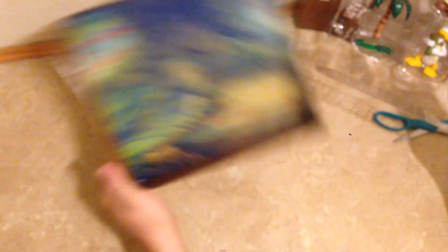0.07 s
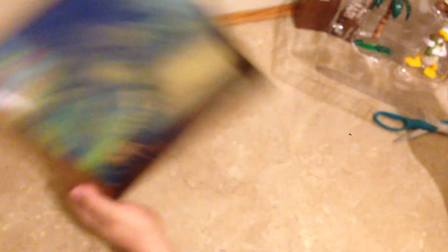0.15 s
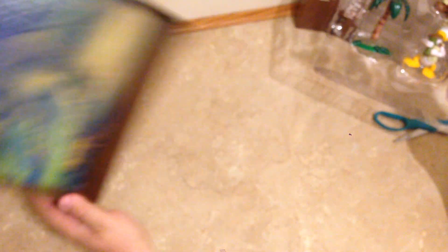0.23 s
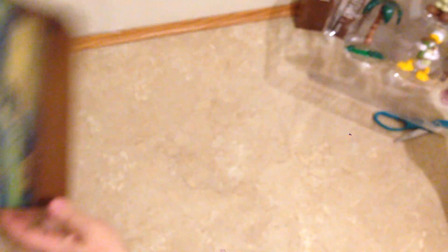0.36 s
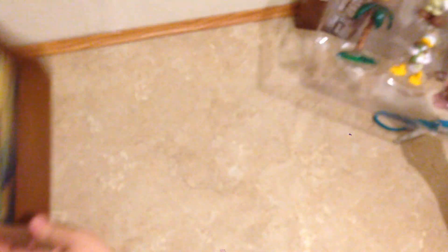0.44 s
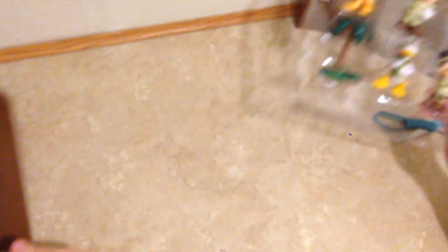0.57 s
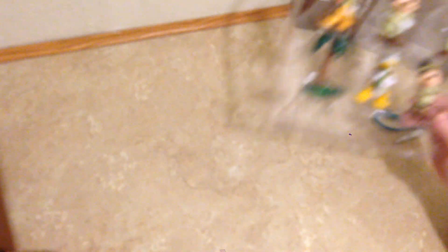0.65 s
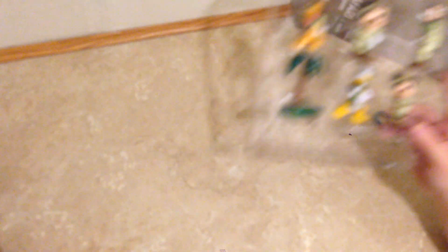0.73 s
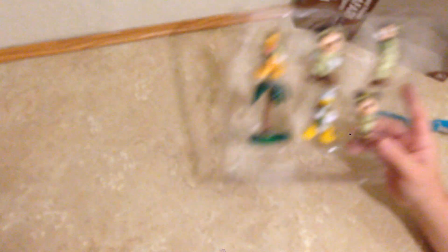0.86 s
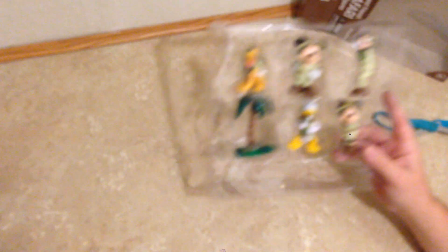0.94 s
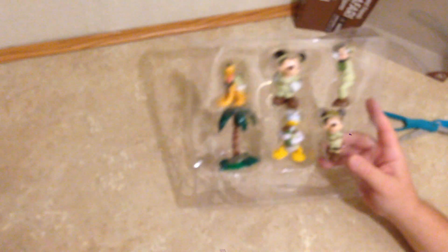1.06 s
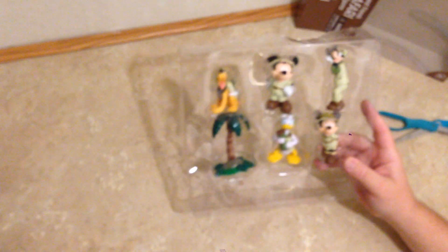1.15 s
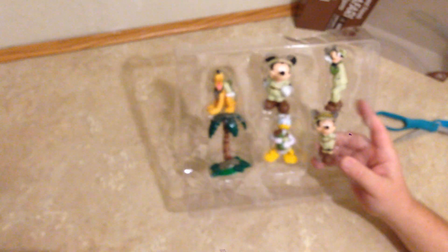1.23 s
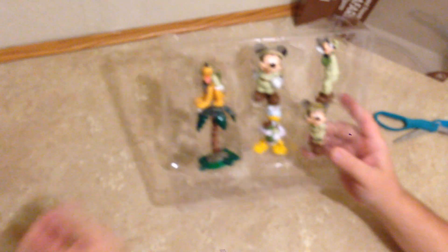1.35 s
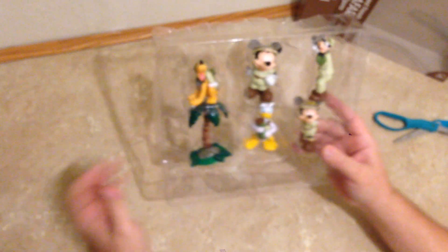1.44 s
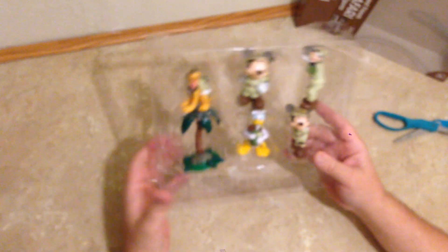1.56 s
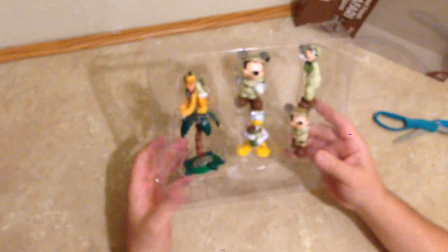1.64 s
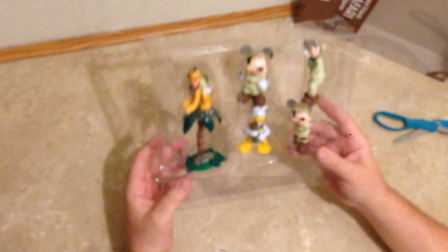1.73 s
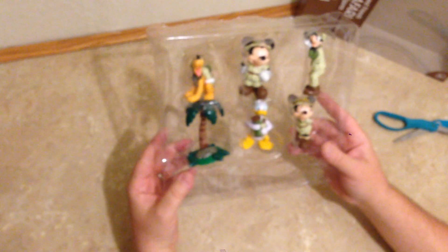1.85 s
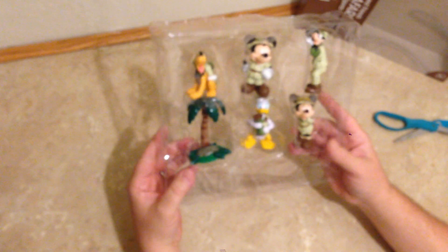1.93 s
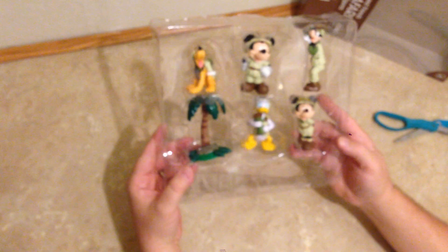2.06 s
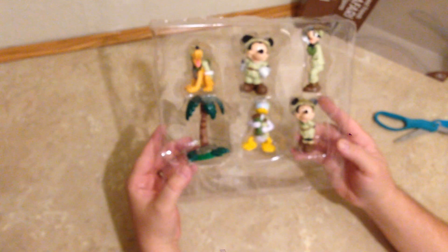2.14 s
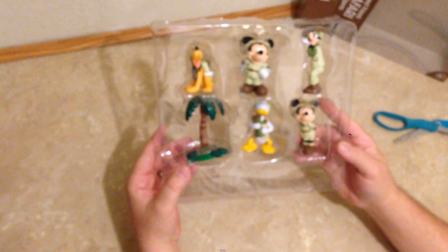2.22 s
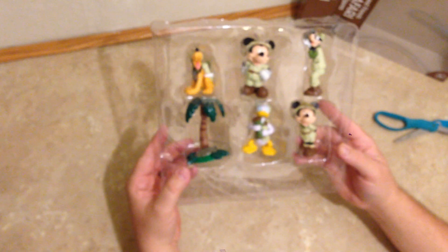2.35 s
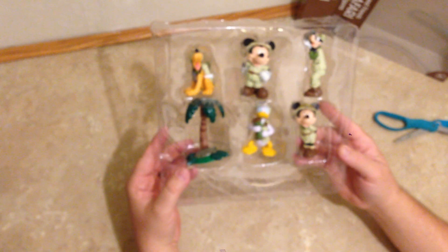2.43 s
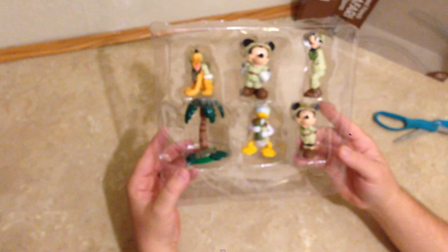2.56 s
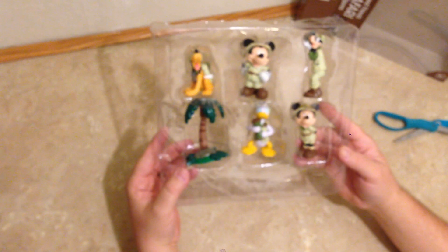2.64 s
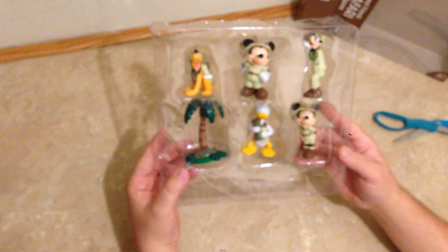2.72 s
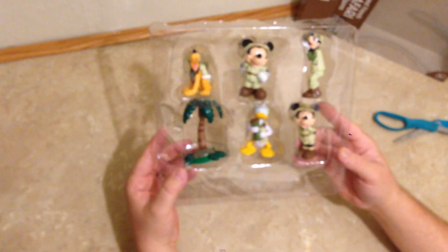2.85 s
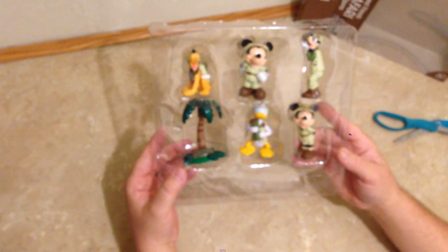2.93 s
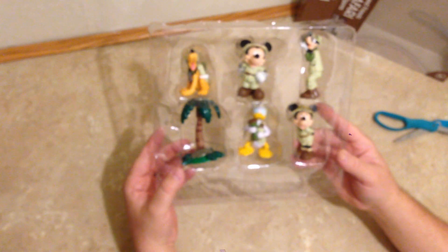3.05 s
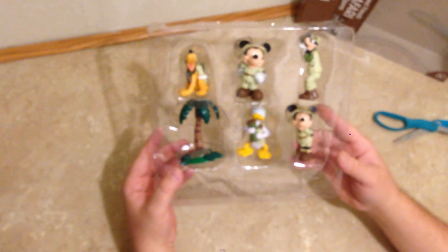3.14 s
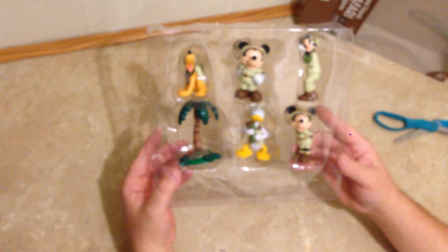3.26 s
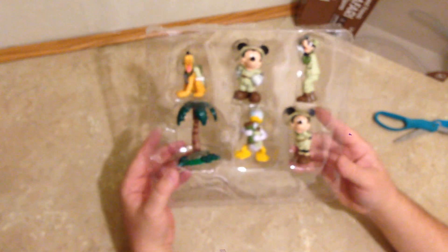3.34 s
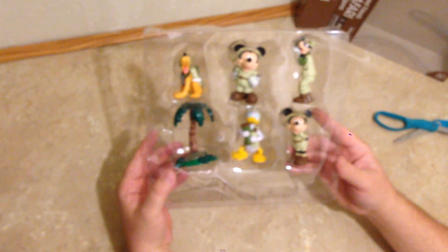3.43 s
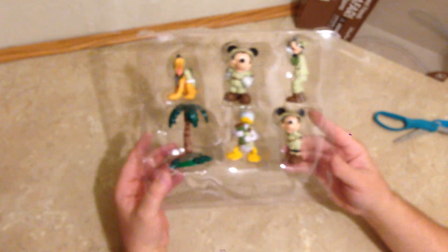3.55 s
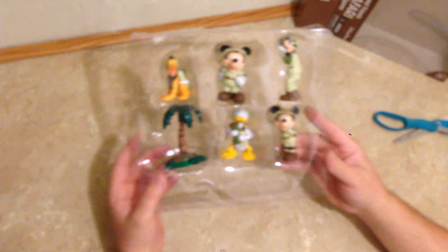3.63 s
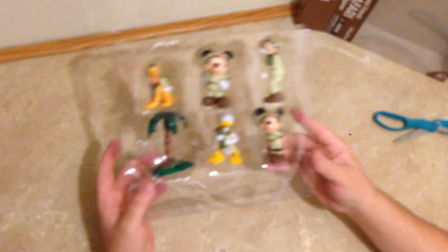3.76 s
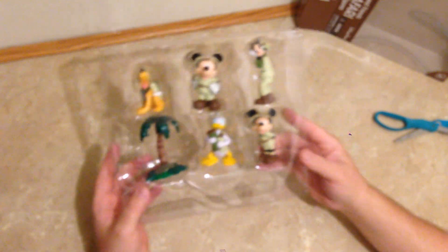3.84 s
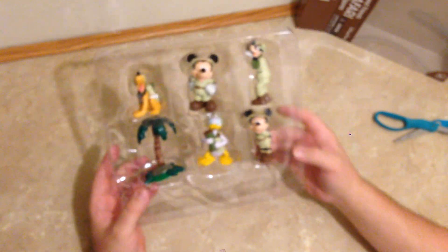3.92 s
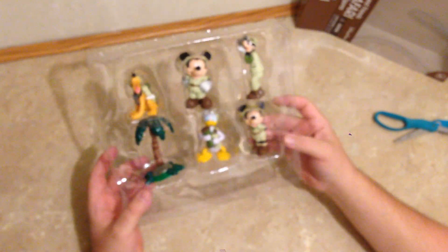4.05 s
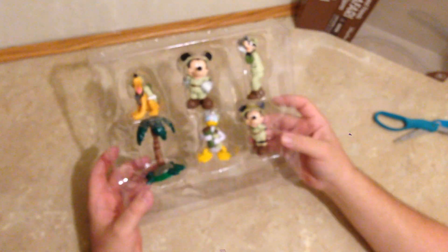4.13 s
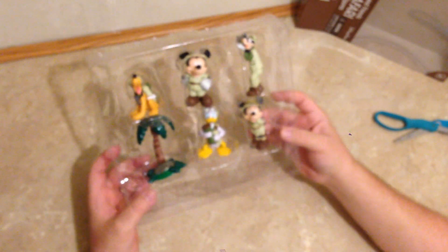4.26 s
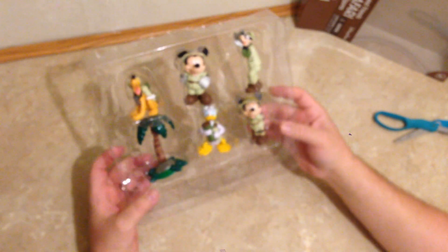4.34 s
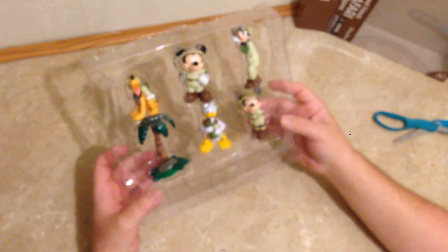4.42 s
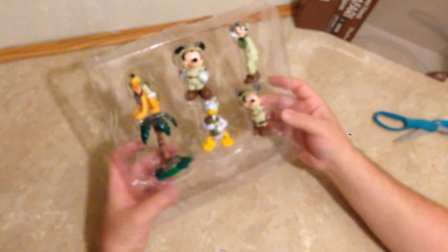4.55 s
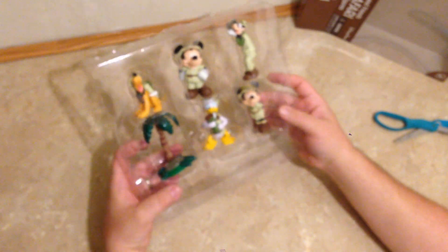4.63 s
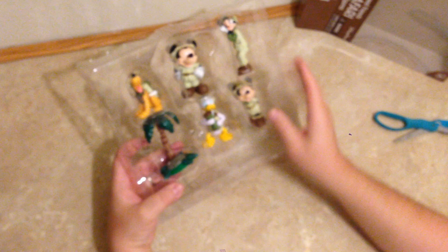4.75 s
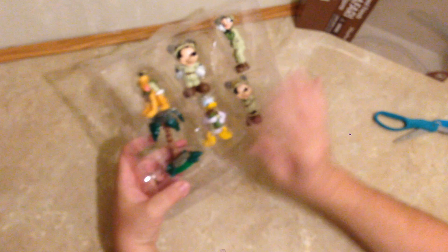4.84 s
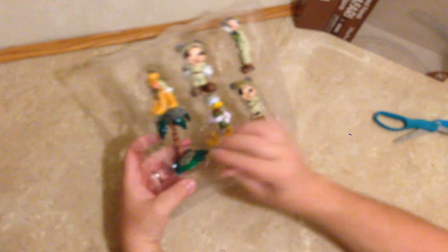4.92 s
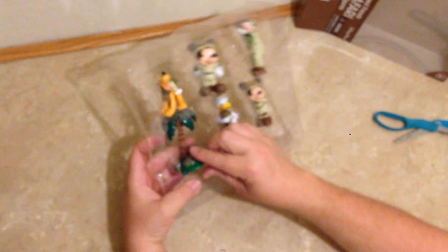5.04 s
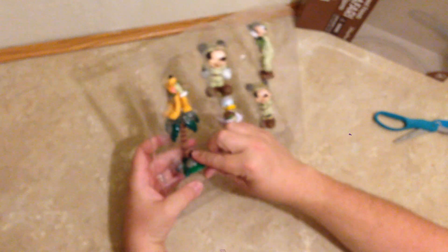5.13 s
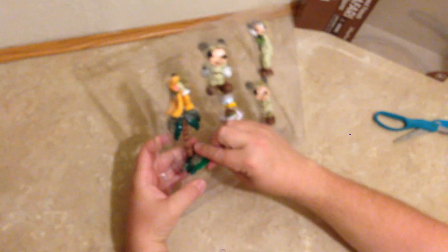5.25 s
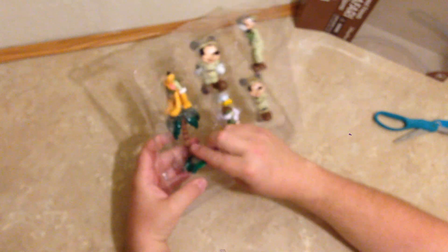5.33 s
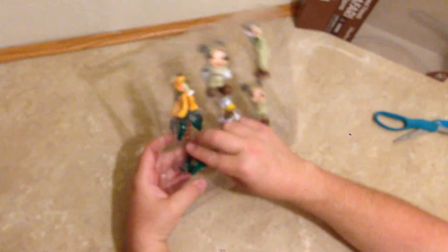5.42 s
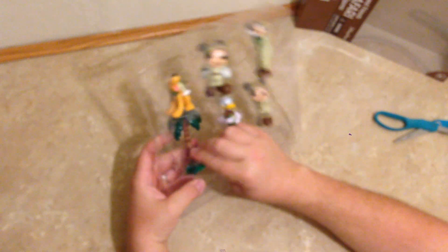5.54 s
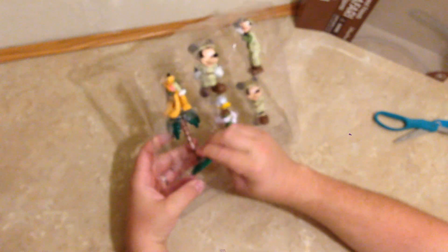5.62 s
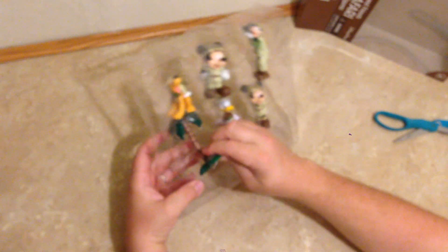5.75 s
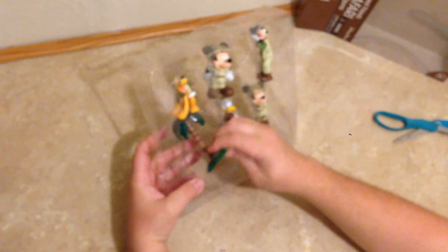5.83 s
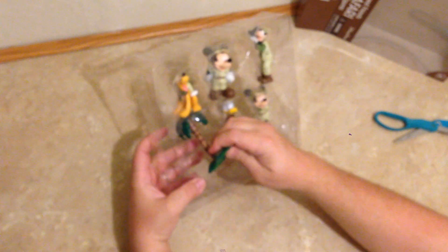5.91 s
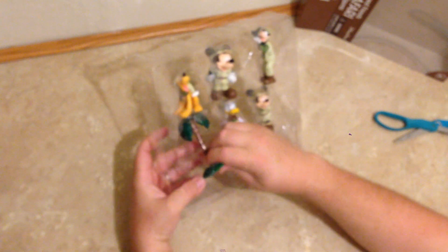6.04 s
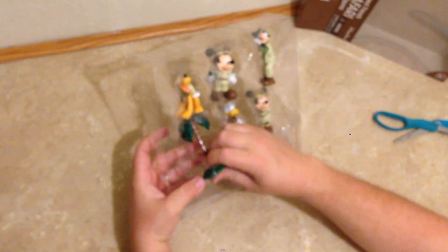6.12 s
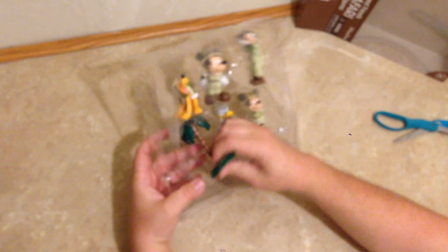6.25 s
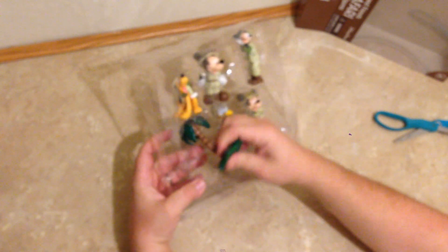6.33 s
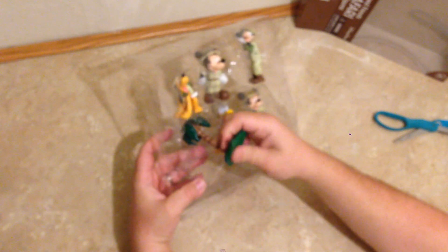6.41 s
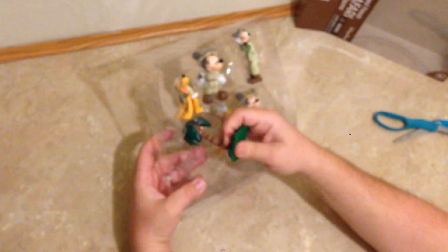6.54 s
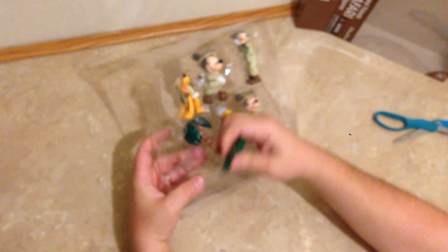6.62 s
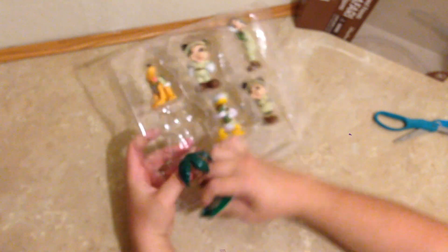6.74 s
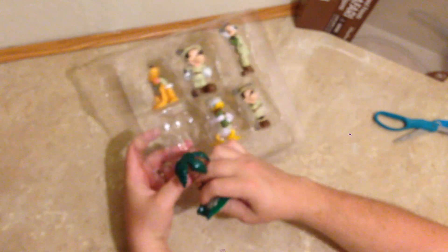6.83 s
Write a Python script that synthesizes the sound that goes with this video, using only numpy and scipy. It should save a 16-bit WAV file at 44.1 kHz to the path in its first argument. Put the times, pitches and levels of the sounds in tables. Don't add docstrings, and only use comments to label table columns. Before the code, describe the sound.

A cardboard box knocks down on a hard floor, then a thin plastic tray crinkles, snaps and finally pops as hands flex it.

```python
import sys
import numpy as np
from scipy import signal
from scipy.fft import rfft, irfft
from scipy.io import wavfile
from scipy.ndimage import uniform_filter1d

SR = 44100
rng = np.random.default_rng(int(sys.argv[2]) if len(sys.argv) > 2 else 0)


def wrap_up_sound(samples):
    columns = np.atleast_2d(samples).T
    tamed = np.clip(columns, -1, 1)
    steps = np.round(tamed * 32767).astype(np.int16)
    wavfile.write(sys.argv[1], SR, steps)


def makeup_ratio(level_db):
    decades = np.asarray(level_db, float) / 20
    return 10 ** decades


N = 303408


def band(x, lo_hz, hi_hz):
    sos = signal.butter(2, [lo_hz, min(hi_hz, .49 * SR)], "band", fs=SR, output="sos")
    return signal.sosfilt(sos, x)


def steep(x, lo_hz, hi_hz):
    return band(band(x, lo_hz / 1.075, hi_hz * 0.97), lo_hz / 1.08, hi_hz * 0.97)


def level(x, db):
    return x * makeup_ratio(db) / np.sqrt(np.mean(x ** 2))


def peak(x, db):
    return x * makeup_ratio(db) / np.max(np.abs(x))


def fade(t, t60):
    return np.exp(-np.log(1000) * t / t60)


def ring(t, hz, db, t60, turn=0):
    modes = np.sin(2 * np.pi * (hz[:, None] * t + turn)) * fade(t, t60[:, None])
    return np.sum(makeup_ratio(db)[:, None] * modes, axis=0)


def add(out, sound, s):
    i = int((s + 0.0006) * SR)
    out[i:i + len(sound)] += sound[:N - i]


def walk(rate):
    k = int(SR / rate)
    steps = np.repeat(rng.standard_normal(N // k + 1), k)
    return 2.96 * uniform_filter1d(uniform_filter1d(steps, k), k)[:N]


# frequency_hz, density_db
AIR_SPECTRUM = [(12, -47), (20, -19), (60, -4), (150, 0.5), (285, -13.5), (430, -14), (850, -28.5),
                (1300, -28), (3000, -29.5), (14000, -33), (16000, -37)]
# frequency_hz, width_hz, level_db
DUCT_MODES = [(62.8, 12, -6.5), (106.3, 6.9, 2.5), (144, 8.4, -32), (165.4, 6.9, 2), (238, 5.6, -46),
              (411, 20, -18)]
# frequency_hz, rms_level_db
MOTOR_LINES = [(236.9, -76), (592.2, -84), (1001, -85), (1061, -78), (1120, -88), (1297, -79), (1416, -86),
               (1475, -75.5), (1712, -89), (1943, -87), (2358, -88), (2417, -88), (2654, -91), (3009, -88)]


def air():
    air_db = -57
    t = np.arange(N) / SR
    hz = np.maximum(np.arange(N // 2 + 1) * SR / N, 1)
    shape_hz, shape_db = np.transpose(AIR_SPECTRUM)
    shape = np.interp(np.log(hz), np.log(shape_hz), shape_db)
    hiss = level(irfft(rfft(rng.standard_normal(N)) * makeup_ratio(shape), N), air_db)
    duct, motor = np.zeros(N), np.zeros(N)
    for f, width, db in DUCT_MODES:
        mode = level(band(rng.standard_normal(N), f - width / 2, f + width / 2), 0)
        duct += makeup_ratio(db + 1.45 * walk(2.8)) * mode * np.sqrt(width)
    for f, db in MOTOR_LINES:
        line = np.sin(2 * np.pi * (f * t + rng.random()))
        motor += np.sqrt(2) * makeup_ratio(db - 1.0 + 1.0 * walk(2.3)) * line
    return hiss + level(duct, air_db) + motor


# time_s, level_db
BRUSH = [
    (0.0, -48.5),
    (0.03, -72),
    (0.25, -73),
    (0.32, -68),
    (0.42, -62),
    (0.52, -64),
    (0.6, -64),
    (0.614, -50),
    (0.63, -80),
]


def brush():
    s, db = np.transpose(BRUSH)
    hiss = band(rng.standard_normal(N), 500, 2840) * makeup_ratio(2.7 * walk(39.8))
    return level(hiss, np.interp(np.arange(N) / SR, s, db, right=-120))


CREASES = [(0.294, -48, 1030, -4, -1), (0.856, -39, 1120, -4, -9), (0.948, -45, 1160, -8, 0),
           (0.97, -46, 1360, 3, -9), (1.462, -49, 920, -6, -17), (1.532, -26, 1490, -7.5, -6.5),
           (1.937, -33.5, 1400, -8, -15), (2.179, -32, 1220, -8, -10), (3.529, -51.5, 1510, -5, -15),
           (3.7, -38.5, 2380, -1, -7), (3.719, -42, 1970, -5, -11), (3.744, -40.5, 1420, 0, -18),
           (3.765, -53, 1390, 11, 5), (4.356, -38, 890, -13, -21), (4.836, -17.5, 2240, -7.5, -14),
           (5.03, -26, 1160, -13, -14), (5.143, -24.5, 3130, -6, -9), (5.179, -28, 2360, -3, -15),
           (5.237, -36.5, 1850, -11, 0), (5.487, -24, 2110, 3.5, -18), (5.51, -21, 1600, -8.5, -11),
           (6.393, -19.5, 1790, -4.5, -18), (6.44, -19, 2000, -5.5, -10), (6.57, -23, 1430, 5.5, -13),
           (6.781, -11, 2050, -10, -14)]
LEADS = [(1.773, -39.5, 2570, -2, -8), (1.9498, -31.5, 1400, -1.5, 1), (4.430, -32.5, 1960, -8, -15),
         (4.557, -41.5, 2030, -4, -14), (4.8215, -30, 1920, -12, -20), (5.707, -25, 1090, -6, -22),
         (6.693, -26, 1980, -23, -28), (6.709, -17.5, 1890, -5, -4), (6.719, -16, 1090, -14, -14),
         (1.072, -37.5, 1300, -4, -14), (0.70, -47, 2980, -5, -14), (2.057, -39.5, 1500, 0.5, -20),
         (3.822, -38, 1720, -6, -12), (3.84, -43.5, 1100, -3, -14), (5.514, -23, 1200, -5, -7),
         (5.94, -28.5, 1480, -5, -12)]
CRINKLES = [(0.838, -36, 1410, -7, -16), (1.809, -27.5, 1580, -7, -13), (1.872, -38, 2330, 6, 4),
            (3.801, -30.5, 1450, -6, -12), (3.927, -51, 1390, -10, 0), (4.633, -35, 1620, -2, -10),
            (4.65, -19.5, 1930, -9, -20), (4.729, -29.5, 1000, 1.5, 1.5), (4.938, -30.5, 2220, 1, -12),
            (4.967, -39, 2470, 4, 3.5), (5.205, -27.5, 1750, 2, 2), (5.334, -19.5, 2320, -3, -7.5),
            (5.373, -14.5, 1270, -5.5, -13), (5.403, -19.5, 3180, -2, -24), (5.583, -22, 2600, -11, -15),
            (5.736, -20.5, 1930, -0.5, -3), (6.271, -22.5, 2440, -6, -11), (6.341, -12.5, 1003, -7, -7),
            (6.509, -21.5, 1670, 3.5, -8), (6.587, -21, 3160, -11.5, -11), (6.605, -21, 2680, -3, -16),
            (6.702, -16.5, 1960, -2, -6), (6.73, -4.5, 1960, -3, -6), (6.748, -16, 2440, -2, 2),
            (6.758, -11, 2230, -4, -16), (6.794, -22, 1830, -6, -21)]
CAVES = [(0.885, -38, 1380, -8, -20), (1.235, -45, 1340, -10, -21), (1.506, -28, 1510, -13, -24),
         (1.553, -30.5, 890, -16, -31), (1.67, -34, 1480, -17, -20), (1.748, -33, 1620, -6, -21),
         (1.788, -22, 1440, -5, -20), (1.923, -34, 1410, -10, -16), (2.029, -23, 2360, -6, -17),
         (2.216, -36.5, 1720, -6, -14), (2.253, -45, 905, -16, -24), (2.334, -47, 1380, -9, -22),
         (3.992, -47.5, 2410, -9, -13), (4.079, -47, 2050, -7, -16), (4.122, -52, 1610, -16, -20),
         (4.166, -37, 904, -9, -26), (4.19, -38.5, 870, -14, -32), (4.38, -41, 1060, -10, -9),
         (4.412, -39, 1400, -12, -15), (4.435, -26.5, 1030, -21, -23), (4.569, -35, 1980, -10, -27),
         (4.685, -23.5, 2850, -8, -21), (5.111, -29.5, 1690, -12, -24), (5.687, -25.5, 1460, -8, -14),
         (5.904, -27, 2400, -6, -16), (5.923, -19.5, 3070, -8.5, -10.5), (6.039, -45, 2260, -11, -22),
         (6.29, -15.5, 2360, -4, -11), (6.464, -25, 1510, -1, -7)]
CLICKS = [(1.192, -44.5, 1420, -2, -20), (1.289, -55, 2440, -12, -15), (1.69, -28.5, 1920, -9, -21),
          (3.548, -51, 1220, -4, -15), (3.786, -42, 1450, -2, -4), (4.615, -47, 2140, -12, -17),
          (4.643, -23, 1940, -16, -12), (4.755, -44, 3130, 6, 2), (5.305, -21, 1930, -10.5, -21),
          (5.447, -11, 1380, -12, -21.5), (5.631, -23.5, 2110, -10, -27), (5.645, -17, 1640, -6, -33),
          (5.653, -15, 1580, -14, -22), (5.66, -17.5, 2000, -9, -26), (5.727, -16.5, 1900, -16, -22),
          (5.789, -26.5, 1100, -11, -27), (5.81, -26, 2080, -4, -16), (5.846, -23.5, 1700, -6.5, -32),
          (6.013, -39, 2500, -7, -17), (6.099, -7.5, 2070, -9, -28), (6.237, -42, 2260, -13, -24),
          (6.257, -20.5, 2040, -12, -27), (6.678, -20.5, 1960, -14, -22), (6.775, -5, 1800, -9, -8),
          (6.82, -13.5, 1230, -6, -26), (6.845, -21.5, 2380, -1.5, -17)]
HOLLOWNESS = [-5.5, -6, -29, -24.5, -12.5]


def buckles():
    out, t = np.zeros(N), np.arange(SR // 6) / SR
    for table, low_db in zip([CAVES, CREASES, CLICKS, CRINKLES, LEADS], HOLLOWNESS):
        for s, peak_db, hz, snap_db, sizzle_db in table:
            add(out, makeup_ratio(peak_db) * buckle(t, hz, low_db, snap_db, sizzle_db), s)
    return out


def buckle(t, hz, low_db, snap_db, sizzle_db):
    luck, hiss = rng.random((2, len(t))), rng.standard_normal((3, len(t)))
    after = (luck[0] < 900 / SR) * hiss[0] * luck[1] ** 2 * 2.67 * fade(t, 0.035)
    front = (0.79 * hiss[1] * fade(t, 0.01) + after) * np.minimum(t / 0.00078, 1)
    steps = np.repeat(hiss[0, :len(t) // 128 + 1], 128)[:len(t)]
    uneven = makeup_ratio(6.1 * uniform_filter1d(steps, size=128) / 3)
    rush = hiss[2] * uneven * np.minimum(t / 0.0033, 1)

    dimple = peak(band(front + .3 * rush * fade(t, .05), hz / 1.11, hz * 1.11), -6)
    middle = peak(steep(front + 0.29 * rush * fade(t, 0.18), 800, 3370), -3.5)
    low = peak(steep(front + 1.15 * rush * fade(t, 0.17), 624, 1208), low_db - .5)
    edge_hz = 3100 * 1.85 ** luck[1, 0]
    snap = peak(band(front + 0.26 * rush * fade(t, 0.17), edge_hz, 1.8 * edge_hz), snap_db - 1.5)
    bright = front + 0.26 * rush * fade(t, 0.11)
    airy = band(bright, 6000, 9500) + .6 * band(bright, 9000, 15500)
    sizzle = peak(airy, sizzle_db - 1.5)
    return dimple + middle + low + snap + sizzle


# time_s, level_db
RUSTLE = [
    [(0.6, -74), (0.87, -47), (1.03, -57), (1.25, -61.5), (1.55, -81), (1.71, -47.5), (1.9, -48.5),
     (2.22, -60.5), (2.45, -75)],
    [(3.45, -66), (3.66, -66), (3.8, -56), (3.9, -63.5), (4.08, -54.5), (4.33, -57.5), (4.45, -47.5),
     (4.53, -56.5), (4.7, -45.5), (5.14, -51), (5.56, -39), (6.02, -46.5), (6.21, -54), (6.45, -34.5),
     (6.68, -50.5), (6.88, -16.5)],
]


def rustle():
    size_db = np.minimum(3.5 * rng.exponential(size=N), 6)
    creases = (rng.random(N) < 4000 / SR) * makeup_ratio(size_db) * rng.standard_normal(N)
    creases = creases * makeup_ratio(1.4 * walk(40)) + .3 * rng.standard_normal(N)
    low, middle, high = band(creases, 232, 555), band(creases, 740, 4400), band(creases, 4300, 9500)
    out, t = np.zeros(N), np.arange(N) / SR
    for table in RUSTLE:
        s, db = np.transpose(table)
        touch = np.clip((t - s[0]) / 0.017, 0, 1) * np.clip((s[-1] + 0.035 - t) / 0.14, 0, 1)
        pressure_db = np.interp(t, s, db)
        for colour, rel_db in [(low, -7.5), (middle, -5), (high, -17)]:
            out += touch * level(colour, pressure_db + rel_db)
    return out


# start_s, peak_db, edge_rel_db (scratch), crack_rel_db (above 3.5 kHz), boom_rel_db (below 250 Hz)
KNOCKS = [
    (0.6155, -2.5, -19, -42, -14),
    (0.790, -12, -31, -34, -11.5),
    (0.999, -9.5, -11, -38, -10),
    (1.042, -16, -5, -33, -1.5),
    (1.053, -15.5, -9, -35, -6),
]
# frequency_hz, level_db, t60_s
BOX = [(196, -1, 0.12), (256, -22, 0.12), (328, 0.7, 0.17), (374, -5, 0.19), (550, -7, 0.16),
       (574, 2.5, 0.14), (735, -21, 0.14), (870, -16, 0.27), (956, -4, 0.21), (1090, -42, .08),
       (1300, -27, 0.1), (1380, -23, 0.17)]
# frequency_hz, level_db, t60_s
BOX_RIM = [(160, -3, .14), (365, -4, 0.067), (604, 1, 0.089), (860, -3, 0.083), (996, -1.5, 0.14),
           (1363, -0.5, 0.091), (1750, -21, 0.046)]


def box():
    out, t = np.zeros(N), np.arange(SR // 4) / SR
    for knock, modes in zip(KNOCKS, [BOX, BOX, BOX_RIM, BOX_RIM, BOX_RIM]):
        s, peak_db, edge_db, crack_db, boom_db = knock
        hz, db, t60 = np.transpose(modes)
        pick, hiss = rng.standard_normal((2, len(hz))), rng.standard_normal((3, len(t)))
        panels = ring(t, hz * (1 + .02 * pick[0]), db + 1.2 * pick[1], .5 * np.minimum(t60, .15))
        rattle = band(hiss[2] * fade(t, 0.07), 350, 1050)
        panels = peak(panels, 0) + peak(rattle, -6.5)
        boom = ring(t, np.array([120., 165., 205.]), np.array([-9., 0., -3.]), np.array([.12, .1, .07]))
        edge = band(hiss[0] * fade(t, 0.032), 600, 1800)
        crack = band(hiss[1] * fade(t, 0.027), 3300, 13000)
        body = (panels + peak(boom, boom_db)) * np.minimum(t / 0.0015, 1)
        add(out, makeup_ratio(peak_db) * (body + peak(edge, edge_db) + peak(crack, crack_db)), s)
    return out


# start_s, peak_db, pitch_hz
PINGS = [(0.8395, -39, 4190), (0.856, -38, 3340), (0.8864, -38, 3980), (0.9712, -43, 4120),
         (1.044, -33, 3140), (3.7244, -43, 4780), (3.7434, -35.5, 3520), (3.7684, -40, 4130),
         (3.7876, -37.5, 3440), (4.3537, -45, 3630), (5.5847, -21, 3600), (5.661, -18, 3460),
         (5.6887, -26, 3920), (5.7063, -21, 3870), (5.7892, -27, 3840), (5.8102, -32, 3200),
         (5.8454, -25.5, 3740), (6.2572, -28, 3070), (6.2713, -24.5, 3660), (6.8454, -21, 5660)]


def pings():
    out, t = np.zeros(N), np.arange(SR // 12) / SR
    for s, peak_db, hz in PINGS:
        kick = rng.standard_normal(len(t)) * (fade(t, 0.0053) + 0.28 * fade(t, 0.11))
        add(out, peak(band(kick, hz / 1.034, hz * 1.116), peak_db - 1.0), s)
    return out


# start_s, peak_db, pitch_hz
FLEX = [(1.202, -42.5, 182), (1.552, -26, 157), (1.688, -29.5, 335), (1.798, -34, 342), (2.034, -29.5, 357),
        (2.179, -40.5, 307), (3.811, -42, 320), (4.434, -40.5, 366), (4.649, -32.5, 202),
        (4.714, -37.5, 335), (4.806, -40, 355), (4.833, -26, 201), (5.031, -33, 363), (5.111, -38.5, 237),
        (5.244, -34.5, 159), (5.272, -37, 294), (5.34, -28.5, 298), (5.386, -28, 340), (5.449, -21.5, 308),
        (5.726, -30.5, 467), (5.837, -36.5, 355), (5.93, -28.5, 333), (6.094, -29, 322), (6.29, -26, 308),
        (6.374, -22, 311), (6.451, -34, 328), (6.568, -41.5, 292), (6.729, -25.5, 340), (6.773, -17, 344)]
# frequency_hz, level_db
TRAY = [(170, -3), (320, 1), (430, -3), (560, -5), (690, -9)]


def flexing():
    out, t = np.zeros(N), np.arange(SR // 8) / SR
    tray_hz, tray_db = np.transpose(TRAY)
    for s, peak_db, hz in FLEX:
        pick = rng.standard_normal((2, len(TRAY)))
        mode_hz = np.append(hz, tray_hz * (1 + .04 * pick[0]))
        mode_db = np.append(0, tray_db - 2.5 + 3.0 * pick[1])
        wobble = ring(t, mode_hz, mode_db, np.full(len(TRAY) + 1, .06))
        add(out, peak(wobble * np.minimum(t / 0.0032, 1), peak_db + 2.5), s)
    return out


# start_s, peak_db, pitch_hz
CRACKS = [(1.505, -24, 2730), (1.952, -23, 6300), (2.0597, -27, 4140), (2.3338, -41, 3580),
          (3.811, -27.5, 3630), (4.1894, -51, 3460), (4.568, -44, 2620), (4.7612, -15, 4540),
          (5.3341, -11.5, 5600), (5.404, -4, 4800), (6.29, -15.5, 3960)]


def cracks():
    out, t = np.zeros(N), np.arange(SR // 10) / SR
    for s, peak_db, hz in CRACKS:
        click = np.sin(2 * np.pi * hz * t) * fade(t, 0.0018)
        scatter = 0.1 * rng.standard_normal(len(t)) * fade(t, 0.025)
        add(out, peak(band(click + scatter, hz / 2, hz * 2), peak_db), s)
    return out


# start_s, peak_db, pitch_hz
TICKS = [(1.5319, -25, 4020), (1.7739, -29, 3430), (1.8088, -26, 4250), (1.8741, -26, 6770),
         (1.922, -38, 3310), (2.0283, -23, 4180), (3.5493, -47, 3270), (3.6995, -37, 3670),
         (3.7873, -31, 3400), (4.1899, -45, 3460), (4.569, -40, 3800), (4.6843, -24, 3360),
         (4.7296, -26, 3150), (4.7374, -18, 4000), (4.8554, -31, 3770), (4.8814, -33, 3070),
         (4.9197, -40, 3720), (4.9377, -26, 3780), (4.9656, -29, 4240), (5.1432, -25, 3130),
         (5.2046, -22, 5140), (5.2385, -27, 5580), (5.3732, -20, 3750), (5.4874, -22, 4710),
         (5.5842, -18, 3600), (5.6535, -23, 3540), (5.6605, -17, 3540), (5.6885, -19, 4020),
         (5.7254, -20, 3520), (5.7369, -18, 4040), (5.7892, -27, 3940), (5.8456, -22, 3770),
         (5.887, -32, 3310), (6.0137, -31, 4060), (6.0975, -16, 3220), (6.2721, -13, 3620),
         (6.341, -15, 4150), (6.3444, -16, 3130), (6.4398, -21, 5880), (6.5091, -19, 3210),
         (6.57, -18, 5350), (6.5874, -19, 3220), (6.6064, -23, 4470), (6.7002, -16, 3550),
         (6.8458, -17, 5630)]


def ticks():
    out, t = np.zeros(N), np.arange(SR // 100) / SR
    for s, peak_db, hz in TICKS:
        click = np.sin(2 * np.pi * hz * t) * fade(t, .0012)
        add(out, peak(band(click, hz / 2.5, hz * 2.5), peak_db - 3.5), s)
    return out


# start_s, peak_db
POP = (6.0975, -0.45)
# frequency_hz, level_db, t60_s
POCKET = [(912, 4.5, 0.095), (1230, -24, 0.17), (1260, -8, 0.11), (1580, -7, 0.14), (1630, 5.5, 0.082),
          (2040, 7, 0.1), (2150, -13, 0.14), (2970, -27, 0.11), (3100, 0, 0.06), (3310, -24, 0.15),
          (3443, -15, 0.18), (4130, -9.5, 0.18), (4759, -38, 0.33)]


def pop():
    out, t = np.zeros(N), np.arange(SR // 5) / SR
    s, peak_db = POP
    hz, db, t60 = np.transpose(POCKET)
    modes = ring(t, hz, db, 0.18 * t60, 0.15 * rng.random((len(hz), 1)))
    add(out, peak(band(modes * np.minimum(t / 0.0025, 1), 630, 8300), peak_db), s)
    return out


# frequency_hz, t60_s
ROOM = [(100, 0.14), (300, 0.2), (1000, 0.2), (3000, 0.086), (8000, 0.17), (15000, 0.33)]


def room(x, wet_db):
    t, tail = np.arange(SR // 2) / SR, 0
    for (lo_hz, lo_t60), (hi_hz, hi_t60) in zip(ROOM, ROOM[1:]):
        noise = band(rng.standard_normal(len(t)), lo_hz, hi_hz)
        tail = tail + noise * fade(t, (lo_t60 + hi_t60) / 2)
    tail = tail * np.clip((t - .003) / 0.0054, 0, 1)
    tail = tail / np.sqrt(np.sum(tail ** 2))
    return x + makeup_ratio(wet_db) * signal.fftconvolve(x, tail)[:N]


def scene():
    plastic = buckles() + rustle() + pings() + cracks() + ticks()
    blows = band(brush() + box() + flexing() + pop(), 132, 12000)
    return (room(blows, -7.5) + room(plastic, -12.5) + air())[None]


def top_cut(x):
    return signal.sosfilt(signal.butter(12, 16450, fs=SR, output="sos"), x)


def record(dry):
    x = dry / (1 + (dry / .72) ** 4) ** .25
    x = signal.sosfilt(signal.ellip(8, .2, 34, 15300, fs=SR, output="sos"), x)
    return top_cut(x)


dry = scene()
out = record(dry)
wrap_up_sound(out)
```